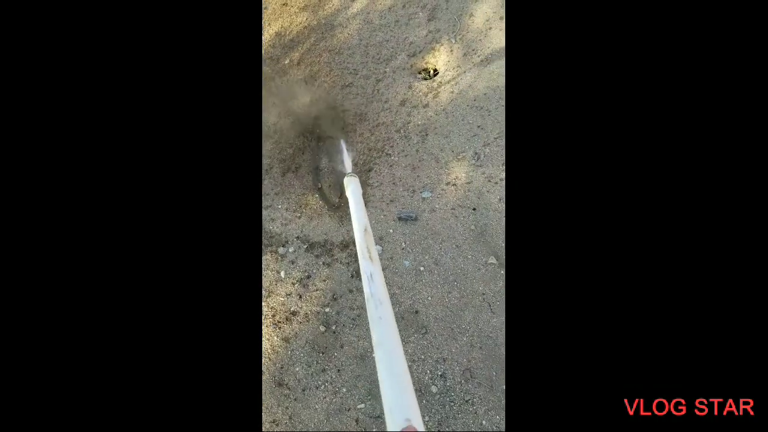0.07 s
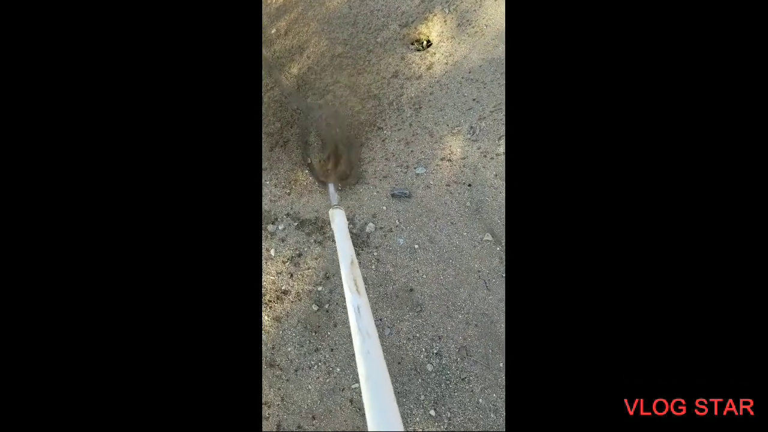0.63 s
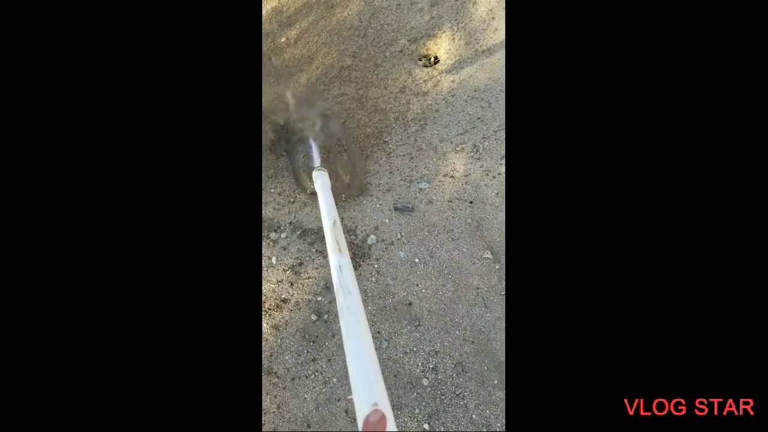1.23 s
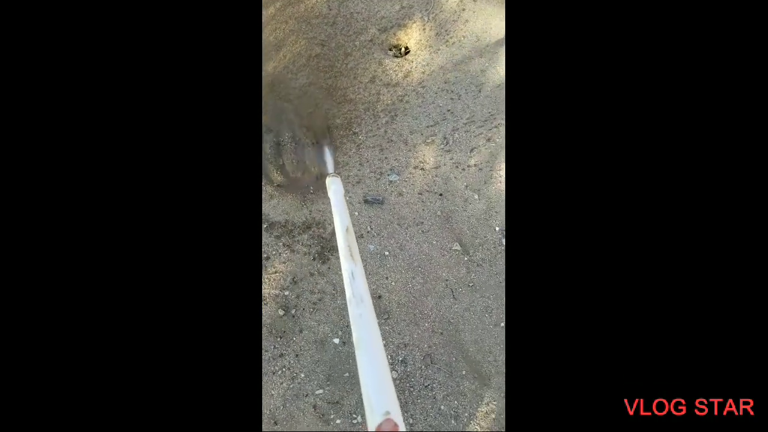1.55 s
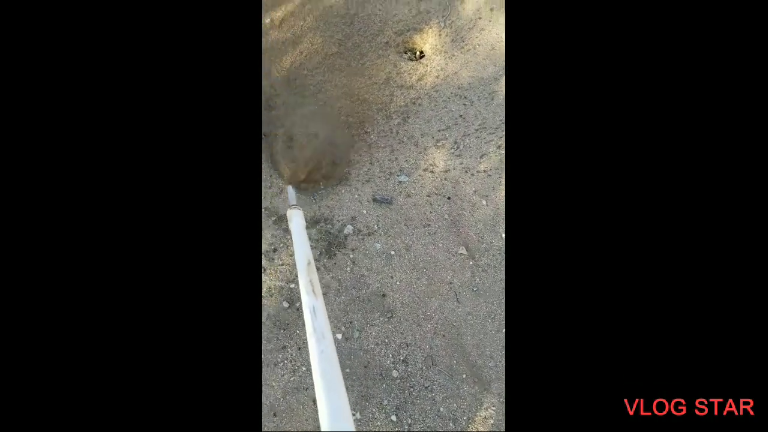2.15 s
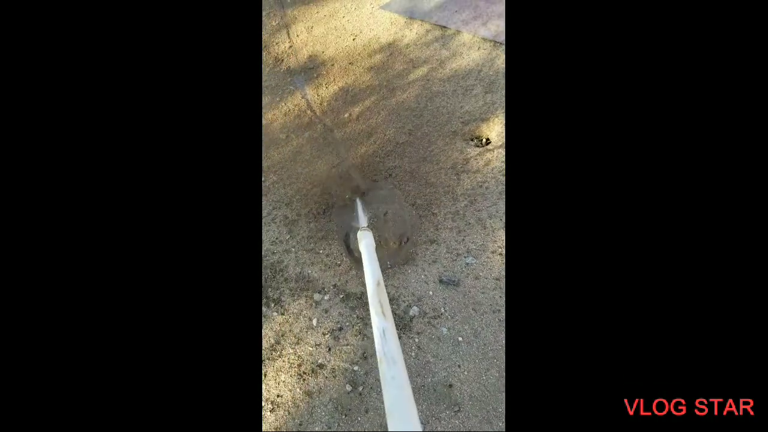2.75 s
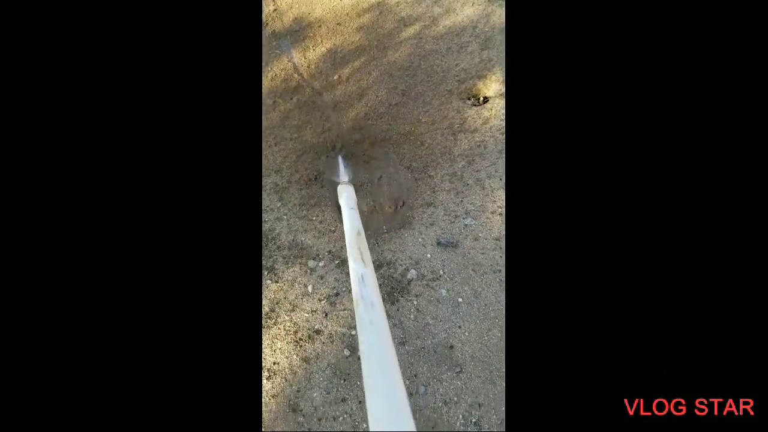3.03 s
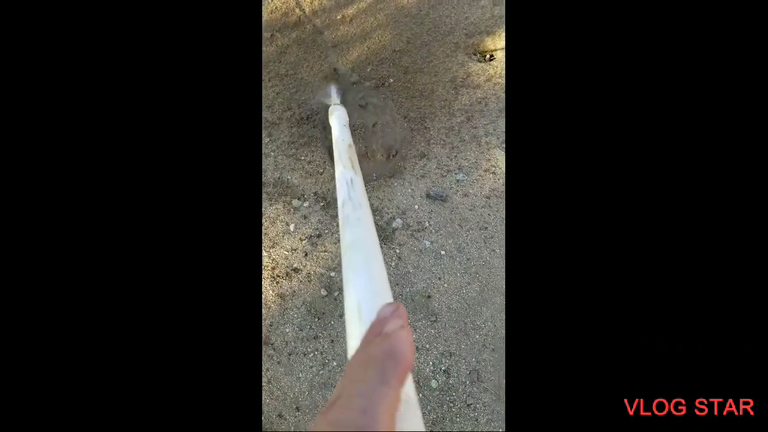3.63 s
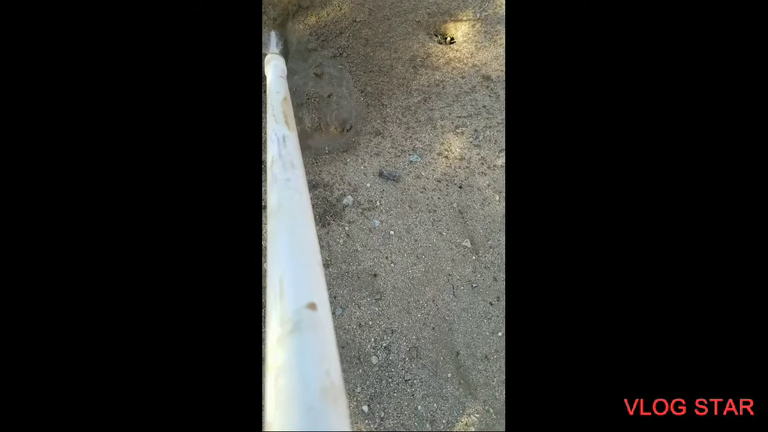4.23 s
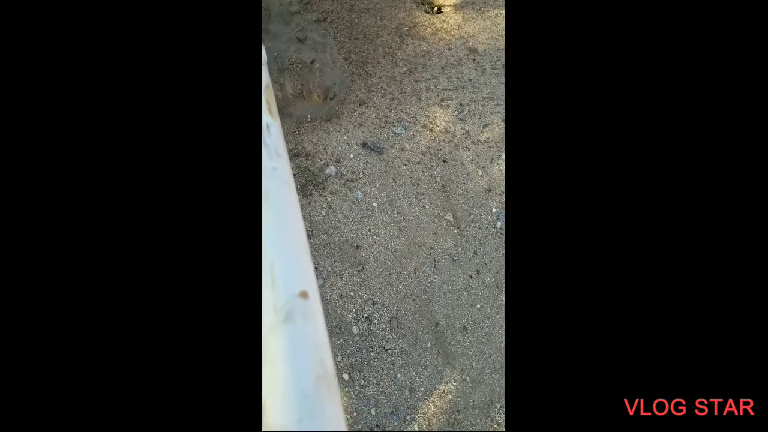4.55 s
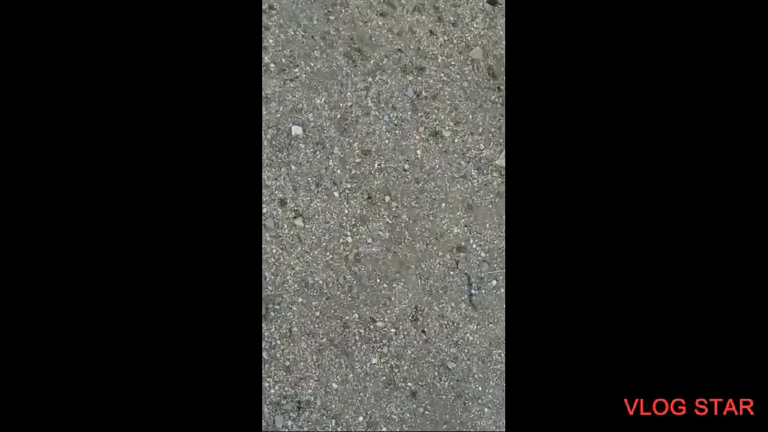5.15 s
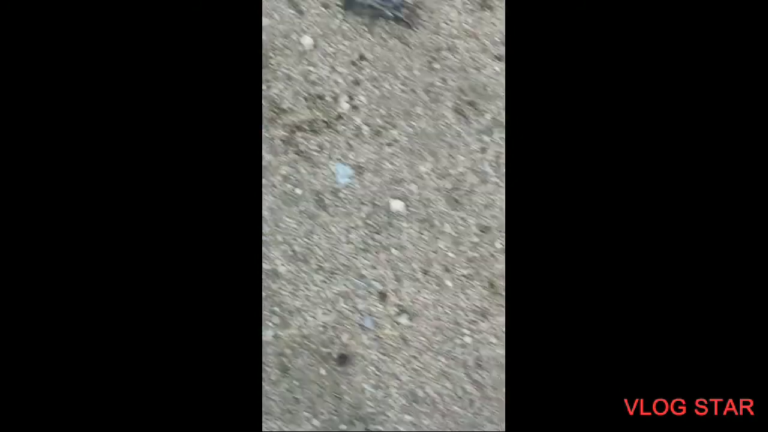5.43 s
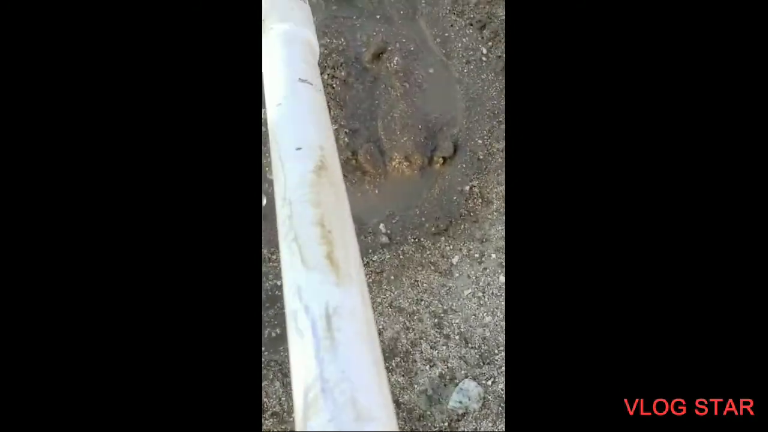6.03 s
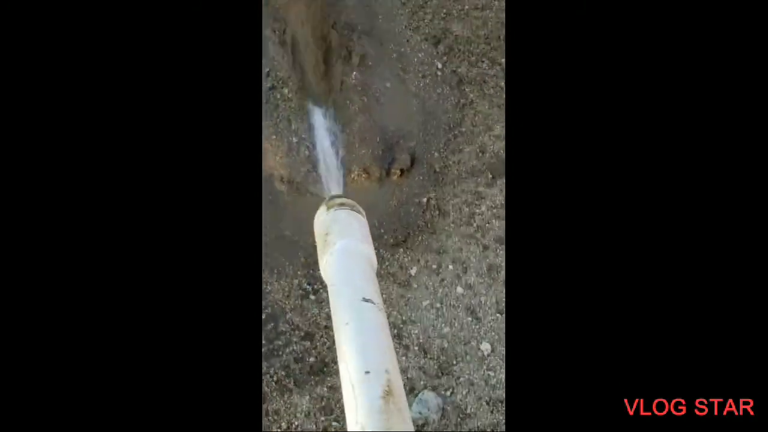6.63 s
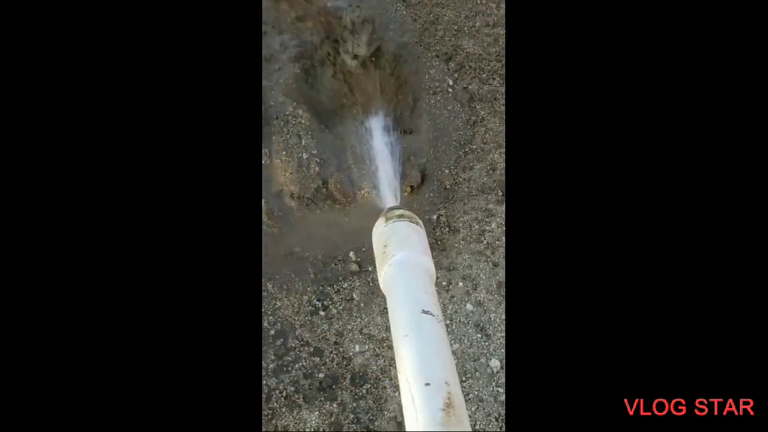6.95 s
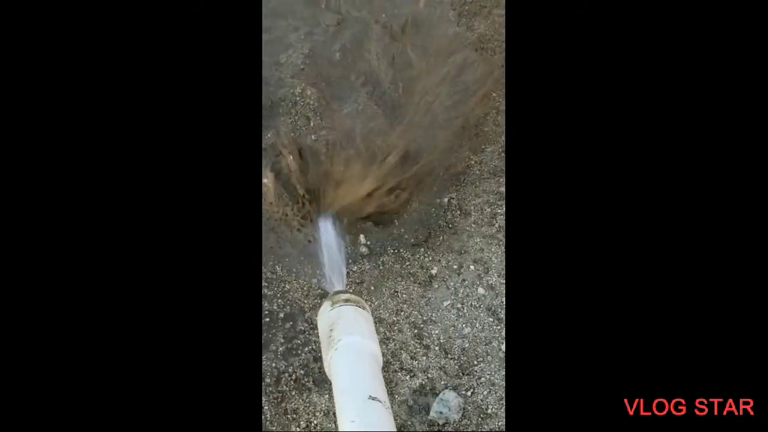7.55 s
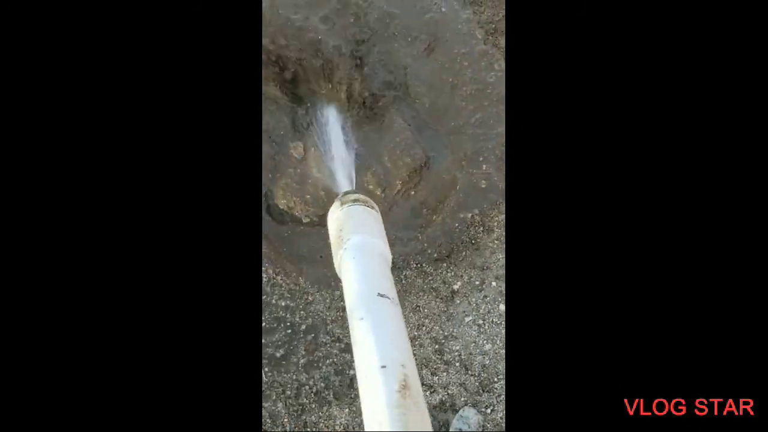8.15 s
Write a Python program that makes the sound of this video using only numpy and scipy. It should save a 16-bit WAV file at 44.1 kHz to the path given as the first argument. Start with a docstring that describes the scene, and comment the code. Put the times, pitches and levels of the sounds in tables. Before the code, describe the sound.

Outdoors, a moving hand-held microphone hears a pipe's water jet hissing and crackling on sand. The jet soon digs in, splashing and bubbling in bursts as it washes out a muddy crater. A few short handling knocks come midway. Finally the water bores a deep hole that rings under the drumming spray. Soft gurgling runoff and a faint, far motor hum lie underneath.

```python
"""A water jet from a plastic pipe sweeps over sandy ground outdoors, heard from a moving hand-held device.
From the start the nozzle hisses, drops spatter on sand, runoff gurgles and far motors drone faintly.
From about 1 s the jet churns mud, trapping bubbles and digging a crater that rings.
Between 3 and 6 s it rushes on in the crater; the hand bumps the microphones a few times.
At 7 s it bores a deep hollow, whose air rings under the drumming spray."""
import sys
import numpy as np
from scipy import signal
from scipy.fft import rfft, irfft, next_fast_len
from scipy.io import wavfile
from scipy.ndimage import map_coordinates

SR = 44100
rng = np.random.default_rng(int(sys.argv[2]) if len(sys.argv) > 2 else 0)


def put_to_file(sound):
    """Save the sound as 16-bit audio at rate SR, in the file named by the first command-line argument."""
    columns = np.atleast_2d(sound).T  # one column per channel
    safe = np.clip(columns, -1, 1)
    whole_steps = np.round(safe * 32767)
    wavfile.write(sys.argv[1], SR, whole_steps.astype(np.int16))


N = 365148
TIME_S = np.arange(N) / SR


def from_db(db):
    """Decibels to gain."""
    return 10 ** (np.asarray(db) / 20)


def unit_rms(x):
    """Scale to rms 1."""
    return x / np.sqrt(np.mean(x ** 2) + 1e-20)


def curves(rows):
    """Each column after t/s, interpolated per sample."""
    times_s, *columns = np.transpose(rows)
    return [np.interp(TIME_S, times_s, column) for column in columns]


def envelope(rows):
    """A dB curve as gain per sample."""
    return from_db(curves(rows)[0])


def drift(per_s):
    """Smooth random wander, rms 1, changing about per_s times a second."""
    hop, settle = 20, 4000
    pole = np.exp(-2 * np.pi * per_s * hop / SR)
    noise = rng.standard_normal(N // hop + settle + 2)
    slow = signal.lfilter([1], [1, -2 * pole, pole * pole], noise)[settle:]
    return np.interp(np.arange(N) / hop, np.arange(len(slow)), unit_rms(slow))


def surge_power(rows, rise_share=0.56):
    """Summed power of skewed bell-shaped swells."""
    power = np.zeros(N)
    for peak_s, db, length_s in rows:
        flank_s = length_s * np.where(TIME_S < peak_s, rise_share, 1 - rise_share)
        u = (TIME_S - peak_s) / flank_s
        power += from_db(db) ** 2 * np.exp(-np.minimum(u ** 2, 20))
    return power


def colour(x, spectrum):
    """Apply a spectrum, falling 12 dB/octave below its lowest point; rms 1."""
    size = next_fast_len(N)
    hz = np.arange(size // 2 + 1) * SR / size + 1e-3
    points_hz, db = np.transpose(spectrum)
    gain = from_db(np.interp(np.log(hz), np.log(points_hz), db)) * np.minimum(hz / points_hz[0], 1) ** 2
    return unit_rms(irfft(rfft(x, size) * gain, size)[..., :N])


def resonate(x, hz, width_hz):
    """Two-pole resonance, peak gain 1."""
    r = np.exp(-np.pi * width_hz / SR)
    poles = [1, -2 * r * np.cos(2 * np.pi * hz / SR), r * r]
    return signal.lfilter(np.array([1, 0, -1]) * (1 - r * r) / 2, poles, x + 1e-18)


def modes(x, rows):
    """Parallel resonances of alternating sign."""
    return sum((-1) ** k * from_db(db) * resonate(x, hz, width_hz)
               for k, (hz, width_hz, db) in enumerate(rows))


def delayed(x, ms):
    """Fractional delay, constant or moving."""
    return map_coordinates(x, [(TIME_S - ms / 1000) * SR], order=3, mode="mirror")


def impacts(per_s, spread_db, slug_db, slugs_per_s):
    """Uneven drop impacts at the wet patch's centre, left and right, swelling with the jet's slugs."""
    hits = rng.random((3, N)) < per_s / SR
    sizes = from_db(spread_db * np.minimum(rng.exponential(1, (3, N)), 4))
    signs = rng.choice([-1, 1], (3, N))
    return unit_rms(hits * sizes * signs * from_db(slug_db * drift(slugs_per_s)))


# hiss, louder with the nozzle near or facing the microphones: t/s, level/dB
HISS_DB = [(0, -35.5), (0.6, -36), (1.4, -32), (1.7, -28.5), (2.05, -30), (2.25, -33), (2.56, -36.5),
           (2.66, -30), (3.3, -31.5), (3.65, -26), (3.9, -30), (4.5, -28), (5.0, -28.5), (5.5, -29),
           (5.9, -32.5), (6.9, -32), (7.5, -30), (8.28, -34.5)]
# hiss colour: f/Hz, level/dB
HISS_SPECTRUM = [(150, -10), (480, -21.5), (700, -15.5), (1300, -6), (2300, -70), (3300, -11), (5200, -1.5),
                 (6500, -1), (8400, -7), (10000, 1), (12300, 5.5), (14000, 2), (15700, -4)]


def nozzle(mud_gain, half_power_db=-18.5):
    """Bright fluttering turbulence, quieter while mud buries the jet."""
    flutter = from_db(1.63 * drift(19))
    uncovered = 1 / np.hypot(1, mud_gain / from_db(half_power_db))
    return envelope(HISS_DB) * uncovered * colour(rng.standard_normal((3, N)) * flutter, HISS_SPECTRUM)


# bite of the jet into the ground, as mud level: t/s, level/dB
BITE_DB = [(0, -48.5), (0.85, -38.5), (1.3, -40), (2.1, -36.5), (2.35, -36.5), (2.58, -35), (2.85, -34.5),
           (3.1, -32.5), (3.35, -30), (3.55, -29), (3.64, -33), (3.73, -28), (3.8, -35), (3.93, -31),
           (4.1, -58), (4.8, -43), (4.87, -46), (4.93, -25.5), (5.03, -21), (5.3, -28.5), (5.55, -36.5),
           (5.68, -28), (5.74, -38.5), (6.3, -53.5), (6.95, -67), (7.15, -31), (8.28, -54)]
# loose sand flings up drops: peak t/s, level/dB, length/s
SPURTS = [(0.2, -40, 0.03), (0.295, -40.5, 0.021), (0.46, -35, 0.046), (0.59, -44, 0.039),
          (0.71, -42.5, 0.12), (0.91, -30, 0.19), (1.17, -35.5, 0.046), (1.27, -36.5, 0.041),
          (1.70, -32, 0.086), (1.94, -55, 0.11), (2.25, -37.5, 0.18), (2.35, -29.5, 0.11),
          (2.47, -30.5, 0.047), (2.68, -33, 0.042), (2.83, -31.5, 0.12), (3.59, -26, 0.033),
          (3.68, -22.5, 0.019), (3.783, -26, 0.04), (3.90, -28.5, 0.11), (3.965, -39, 0.02),
          (4.02, -35.5, 0.21), (5.2, -32, 0.1), (5.45, -28.5, 0.14), (5.60, -27.5, 0.059),
          (5.68, -35, 0.053), (6.13, -34, 0.084), (6.33, -34, 0.15), (6.65, -31.5, 0.049),
          (6.73, -33, 0.021), (7.29, -32, 0.031), (7.78, -30, 0.096), (7.995, -32, 0.077),
          (8.26, -31.5, 0.16)]
# soft spots are gouged out: peak t/s, level/dB, length/s
GOUGES = [(0.96, -26.5, 0.051), (1.07, -28, 0.029), (1.72, -34, 0.11), (2.26, -32.5, 0.14),
          (2.74, -26, 0.069), (3.2, -29.5, 0.087), (3.41, -24.5, 0.08), (3.58, -29, 0.09),
          (3.785, -32, 0.03), (3.92, -27, 0.16), (4.95, -42, 0.051), (5.06, -27, 0.098), (5.62, -49, 0.12),
          (6.15, -34, 0.048), (6.33, -36.5, 0.041), (6.78, -37.5, 0.13), (7.79, -31, 0.064)]


def erosion(usual_bite_db=-40, uneven_db=0.8):
    """Spray and mud gains follow the bite into uneven ground, plus spurts and gouges."""
    bite_db = curves(BITE_DB)[0] + uneven_db * drift(10.0)
    spray_db = -40.5 + 0.45 * (bite_db - usual_bite_db)
    spray_gain = np.sqrt(from_db(spray_db) ** 2 + surge_power(SPURTS))
    mud_gain = np.sqrt(from_db(bite_db) ** 2 + surge_power(GOUGES))
    return spray_gain, mud_gain


# fine drops: f/Hz, level/dB
SPRAY_SPECTRUM = [(150, -16), (480, -26), (800, -2.5), (1300, -4.5), (1900, 6.5), (3000, 7.5), (4200, 12.5),
                  (5500, 9), (8400, 0.5), (11500, 2), (15700, -36)]
# sand grains and fat drops: f/Hz, level/dB
GRIT_SPECTRUM = [(400, -35.5), (750, 2.5), (1900, 4), (3500, 1.5), (6000, 14.5), (9000, -24), (15700, -16)]


def spatter(spray_gain, grit_db=-7.5):
    """Thousands of tiny drops tick on the sand; flung grit and fat drops crackle singly."""
    drops = colour(impacts(per_s=6500, spread_db=3.0, slug_db=2.0, slugs_per_s=16), SPRAY_SPECTRUM)
    grit = colour(impacts(per_s=230, spread_db=3.0, slug_db=2.5, slugs_per_s=11), GRIT_SPECTRUM)
    return spray_gain * (drops + from_db(grit_db) * grit)


# muddy water draining: t/s, level/dB
RUNOFF_DB = [(0, -41), (0.67, -44.5), (1.0, -39.5), (2.4, -39.5), (3.5, -38.5), (3.95, -41), (4.86, -41),
             (4.92, -62), (5.3, -52), (5.7, -43), (8.28, -41.5)]
# small air pockets: f/Hz, width/Hz, level/dB
POCKET_MODES = [(332, 400, -8.5), (760, 310, 1.5), (920, 430, 0.5), (1360, 790, -4)]
# large pockets filling: peak t/s, level/dB, length/s
GULPS = [(0.2, -61, 0.4), (1.02, -54, 0.17), (1.36, -56, 0.28), (2.35, -55, 0.26), (2.76, -56.5, 0.17),
         (3.42, -50.5, 0.18), (3.85, -61, 0.22), (4.35, -53.5, 0.4), (5.05, -73, 0.62), (5.62, -51, 0.067),
         (6.15, -60, 0.63), (6.85, -59, 0.44), (7.3, -54.5, 0.4), (8.12, -57.5, 0.28)]


def runoff(gurgle_db=-6.5, gulp_hz=320, gulp_width_hz=200):
    """Small air pockets plop in the draining mud; now and then a large one gulps."""
    plops = impacts(per_s=1000, spread_db=2.5, slug_db=3.0, slugs_per_s=11.6)
    pockets = sum(from_db(db) * resonate(resonate(plops, hz, width_hz), hz, width_hz)
                  for hz, width_hz, db in POCKET_MODES)
    gurgle = from_db(gurgle_db) * envelope(RUNOFF_DB) * unit_rms(pockets)
    gulp = resonate(resonate(plops, gulp_hz, gulp_width_hz), gulp_hz, gulp_width_hz)
    return gurgle + np.sqrt(surge_power(GULPS)) * unit_rms(gulp)


# outdoor rumble: f/Hz, level/dB
RUMBLE_SPECTRUM = [(20, -32), (35, -8), (55, -10), (75, 0), (100, -5.5), (135, -6.5), (180, -23),
                   (300, -19.5), (500, -21), (900, -23.5)]
# distant engine, slowing late: t/s, f/Hz, level/dB
ENGINE_TRACK = [(0, 52, -60), (.9, 55, -57.5), (2.0, 54, -58), (3.0, 56, -61), (6.6, 56, -61),
                (7.1, 50, -58), (7.6, 42, -63), (8.28, 38, -65)]


def far_motors(rumble_db=-53.5, apart_db=-9.0, hum_hz=121.0, hum_db=-66.5):
    """Outdoor rumble, a throbbing engine and an electric motor's wavering hum."""
    air = rng.standard_normal(N) + from_db(apart_db) * rng.standard_normal((2, N))
    rumble = colour(air * from_db(2.0 * drift(5.4)), RUMBLE_SPECTRUM)
    engine_hz, engine_db = curves(ENGINE_TRACK)
    throb = 1 + np.tanh(drift(9.4)) / 2
    engine = from_db(engine_db) * throb * np.sin(2 * np.pi * np.cumsum(engine_hz + 3.5 * drift(7.2)) / SR)
    hum_gain = from_db(hum_db + 2.0 * drift(2.3))
    hum = hum_gain * np.sin(2 * np.pi * np.cumsum(hum_hz + 0.48 * drift(3.5)) / SR)
    return from_db(rumble_db) * rumble + np.sqrt(2) * (engine + hum)


# churned mud: f/Hz, level/dB
MUD_SPECTRUM = [(150, -17), (500, -14), (800, -3), (1200, -1), (1600, 5), (2100, 13.5), (2450, 5),
                (2850, 11), (3500, -1.5), (4400, 0.5), (6000, -5), (8500, -55), (15700, -51)]
# crater ring relative to the mud, strongest when deep: t/s, level/dB
CRATER_RING_DB = [(1.8, -36), (2.3, 4.5), (3.4, -3), (3.65, -3.5), (3.9, -1), (5.1, -11), (6.7, 12.5),
                  (7.1, -20)]
# clods giving way: t/s, relative peak/dB
SPLATS = [(2.252, -7), (2.7294, -24), (3.3916, -1.5), (3.418, -7), (3.5838, -10), (3.678, -9), (3.773, -10),
          (3.785, -6), (3.884, -8), (3.968, -10), (5.6133, -8), (7.776, 2)]


def churn(mud_gain, bubble_cycles=4.1, bubble_db=-5.5, splat_db=-20.0, splat_decay_s=0.0055):
    """Slugs slap the mud, trap briefly ringing bubbles and ring the crater; clods splat in sharp surges."""
    slaps = impacts(per_s=7000, spread_db=3.0, slug_db=-1.0, slugs_per_s=46)
    births = impacts(per_s=2500, spread_db=5.5, slug_db=2.5, slugs_per_s=7.1)
    pitches_hz = np.geomspace(700, 6000, 16)
    pitch_index = rng.integers(0, len(pitches_hz), N)
    bubbles = sum(resonate(births * (pitch_index == k), hz, hz / bubble_cycles)
                  for k, hz in enumerate(pitches_hz))
    mud = colour(slaps + from_db(bubble_db) * unit_rms(bubbles), MUD_SPECTRUM)
    crater_slaps = impacts(per_s=3700, spread_db=1.0, slug_db=4.5, slugs_per_s=27)
    ring = envelope(CRATER_RING_DB) * crater(crater_slaps)
    force = mud_gain.copy()
    for onset_s, db in SPLATS:
        start = int(onset_s * SR)
        decay = np.exp(-np.minimum(TIME_S[:N - start] / splat_decay_s, 20))
        force[start:] += from_db(db + splat_db) * decay
    return force * unit_rms(mud + ring)


# crater resonances: f/Hz, width/Hz, level/dB
CRATER_MODES = [(2040, 260, 10.5), (2580, 1080, 17), (4480, 530, 13.5)]


def crater(slaps, pitch_wander=0.041, changes_per_s=3.0):
    """The crater rings, its pitch sliding as the walls cave in and wash out; rms 1."""
    slip_ms = 1000 * np.cumsum(pitch_wander * drift(changes_per_s)) / SR
    return unit_rms(np.array([delayed(part, slip_ms) for part in modes(slaps, CRATER_MODES)]))


# jet resting in its crater: t/s, level/dB
RUSH_DB = [(3.2, -59), (3.45, -25.5), (3.64, -45), (3.78, -34), (3.92, -35), (4.15, -44.5), (4.86, -36),
           (4.95, -46), (5.1, -35), (5.45, -43), (5.8, -41)]


def rush():
    """Held in one place, the jet keeps the crater ringing."""
    return envelope(RUSH_DB) * crater(impacts(per_s=7700, spread_db=1.0, slug_db=2.0, slugs_per_s=39))


# hand knocks: t/s, level/dB, push length/ms
BUMPS = [(3.314, -37, 0.45), (4.037, -29, 0.34), (4.1, -41, 0.85), (4.652, -28, 0.35),
         (4.6607, -18.5, 0.31)]


def bumps(thud_hz=85, thud_width_hz=45, thud_db=2.0, left_lag_ms=0.64):
    """Each knock pushes the case in and out once and leaves a brief thud; the left port moves later."""
    push = np.zeros(N)
    for centre_s, db, length_ms in BUMPS:
        u = (TIME_S - centre_s) * 1000 / length_ms
        push -= from_db(db) * u * np.exp((1 - u ** 2) / 2)
    knock = push + from_db(thud_db) * resonate(push, thud_hz, thud_width_hz)
    return np.array([delayed(knock, left_lag_ms), knock]) * pan(-4.0)


# washed-out hollows, faint until the deep one at 7 s: t/s, level/dB
HOLLOW_DB = [(0, -46.5), (2.0, -48), (4.3, -50), (6.6, -44.5), (6.93, -43), (7.03, -33), (7.18, -30),
             (7.37, -32), (7.5, -28.5), (7.64, -31.5), (7.78, -25), (7.88, -27.5), (8.0, -28.5), (8.1, -33),
             (8.28, -28)]
# air resonances of the hollow: f/Hz, width/Hz, level/dB
HOLLOW_MODES = [(1640, 470, -4), (1844, 410, 2), (2070, 108, 3.5), (2660, 550, -7.5), (3716, 153, 0),
                (5060, 1000, -14.5), (6990, 510, -8.5), (12200, 4600, -10)]


def hollow():
    """Spray drums inside the washed-out hole, whose air rings."""
    drumming = impacts(per_s=3200, spread_db=3.0, slug_db=1.5, slugs_per_s=45)
    return envelope(HOLLOW_DB) * unit_rms(modes(drumming, HOLLOW_MODES))


def pan(db):
    """Stereo gains for a left-minus-right level."""
    return from_db(np.array([[db], [-db]]) / 2)


def placed(parts, edges_db, pan_db):
    """Weigh a wet patch's centre against its edges: (centre, edges) x (left, right) x time."""
    sides, edge_gain = pan(pan_db), from_db(edges_db)
    return np.array([parts[0] * sides, edge_gain * parts[1:] * sides]) / np.hypot(1, edge_gain)


def ground_echoes(lead_ms, gain_db=-2.0, nearest_ms=0.401, spread_ms=0.9, glide=2.58, count=8):
    """Echoes off clods and puddles come and go, gliding as the device turns: (delay/ms, gain) each."""
    glide_ms = glide * (lead_ms - lead_ms.min())
    return [(nearest_ms + spread_ms * min(distance, 3) + slant * glide_ms,
             from_db(gain_db) * drift(1.92) / np.sqrt(count))
            for distance, slant in zip(rng.exponential(1, count), rng.uniform(0.47, 2.05, count))]


def reflected(x, paths, corner_hz=2000, comb_share=0.45, size=1024):
    """Add moving echoes frame by frame; small surfaces return only treble."""
    framing = dict(nperseg=size, noverlap=size * 5 // 8)
    hz, frame_s, frames = signal.stft(x, SR, **framing)
    at = np.minimum((frame_s * SR).astype(int), N - 1)
    echoes = sum(gain[at] * np.exp(-2j * np.pi * np.outer(hz, ms[at]) / 1000) for ms, gain in paths)
    comb = 1 + echoes * (hz ** 2 / (hz ** 2 + corner_hz ** 2))[:, None]
    comb = np.abs(comb) ** comb_share * np.exp(1j * np.angle(comb))  # full phase, reduced dB ripple
    return signal.istft(frames * comb, SR, **framing)[1][:N]


# device turning against the jet: t/s, left lead/ms
LEAD_MS = [(0, 0.19), (1.6, 0.21), (2.1, .18), (2.33, 0.12), (2.62, 0.12), (2.9, .2), (3.5, 0.25),
           (4.0, 0.2724), (5.15, 0.27), (5.5, 0.25), (5.78, .22), (6.0, 0.22), (6.17, 0.203), (6.35, 0.22),
           (6.6, 0.16), (7.1, 0.19), (7.75, 0.16), (8.28, 0.2)]
# hand and ground echoes, right port: base delay/ms, extra ms per ms of lead, gain
NEAR_ECHOES = [(-.044, 2.713, 0.35), (0.388, 1.245, 0.18), (0.872, 0.16, -0.37), (0.599, 0.42, 0.31),
               (0.653, 4.4, 0.25)]
# echo off the passing pipe, right port: t/s, gain
PIPE_ECHO_GAIN = [(3.1, 0.066), (3.5, .35), (4.4, 0), (5.25, 0.12), (5.7, 0)]


def microphones(centre, edges, pipe_ms=0.63):
    """The centre reaches the left port first; short echoes smear the image and shift as the device turns."""
    lead_ms, = curves(LEAD_MS)
    left, right = np.array([centre[0], delayed(centre[1], lead_ms)]) + edges
    near = [(ms + per_lead * lead_ms, np.full(N, gain)) for ms, per_lead, gain in NEAR_ECHOES]
    pipe = [(pipe_ms + lead_ms, curves(PIPE_ECHO_GAIN)[0])]
    return np.array([reflected(left, ground_echoes(lead_ms)),
                     reflected(right, ground_echoes(lead_ms) + near + pipe)])


# case response between the ports: f/Hz, left minus right/dB, left lead/rad
PORT_RESPONSE = [(100, 0.5, -.3), (436, -13, 0.74), (580, 3, -1.5), (770, -12.5, -0.66), (1010, -9, -0.2),
                 (1230, -3, -0.6), (1350, -5.5, -0.29), (1760, -10.5, -1.54), (1990, -9, -0.89),
                 (2500, -8, 0.16), (2790, -6, -0.18), (3330, -7.5, -0.79), (4050, -7, -1.24),
                 (4850, -5.5, -0.45), (7130, -6.5, 0.46), (7860, -1, 2.06), (8350, -8.5, -0.9),
                 (9900, 1.5, 1.8), (12300, -8, 1.45), (12400, 0, 0.89), (15500, -10.5, 0.59)]


def case_shading(pair):
    """The device's body shades and delays left and right in opposite ways."""
    size = next_fast_len(N)
    log_hz = np.log(np.arange(size // 2 + 1) * SR / size + 1)
    points_hz, db, lead_rad = np.transpose(PORT_RESPONSE)
    half = np.array([[.5], [-.5]])
    gain = from_db(half * np.interp(log_hz, np.log(points_hz), db))
    gain /= np.sqrt(np.mean(gain ** 2, axis=0))
    rotation = np.exp(1j * half * np.interp(log_hz, np.log(points_hz), lead_rad))
    return irfft(rfft(pair, size) * rotation * gain, size)[:, :N]


def scene(water_db=-2.0):
    """Water and far motors heard through the case, plus knocks on it."""
    spray_gain, mud_gain = erosion()
    centre, edges = (placed(nozzle(mud_gain), edges_db=-4.5, pan_db=3.5)
                     + placed(spatter(spray_gain), edges_db=-16.5, pan_db=4.5)
                     + placed(churn(mud_gain), edges_db=-5.5, pan_db=5.0)
                     + placed(hollow(), edges_db=-22.0, pan_db=-0.5)
                     + placed(runoff(), edges_db=-10.5, pan_db=7.0)
                     + placed(rush(), edges_db=-34.0, pan_db=5.5))
    return case_shading(from_db(water_db) * microphones(centre, edges) + far_motors()) + bumps()


def record(dry):
    """Steep low-pass at 15950 Hz."""
    return signal.sosfilt(signal.ellip(12, .1, 80, 15950, fs=SR, output="sos"), dry)


dry = scene()
out = record(dry)
put_to_file(out)
```